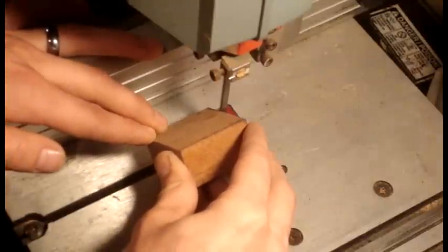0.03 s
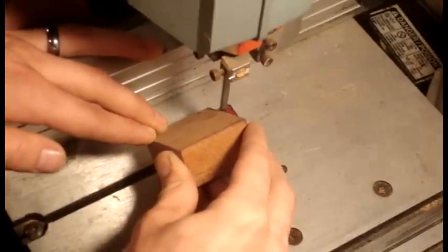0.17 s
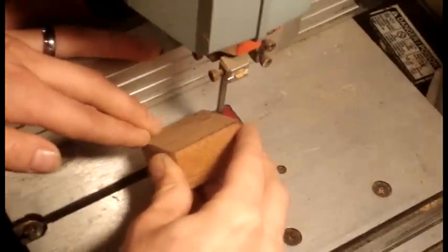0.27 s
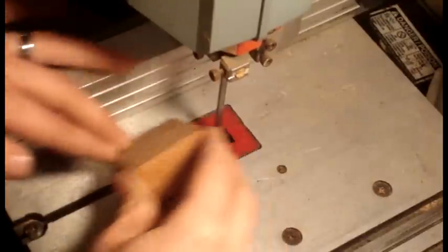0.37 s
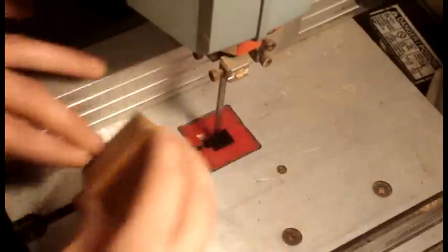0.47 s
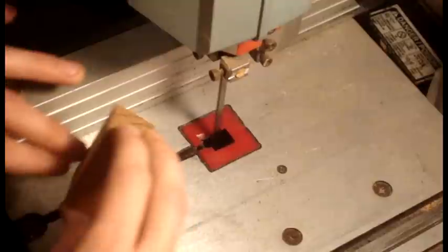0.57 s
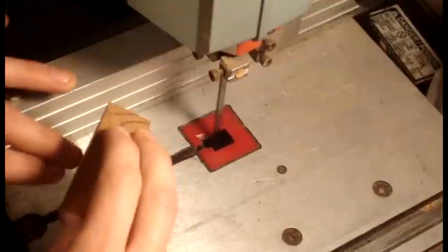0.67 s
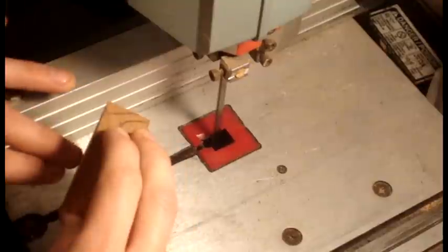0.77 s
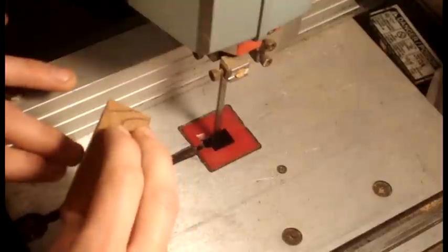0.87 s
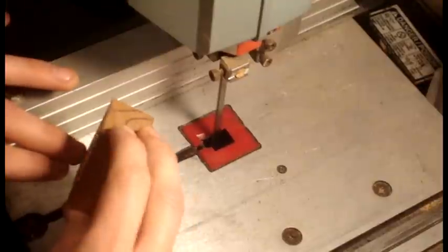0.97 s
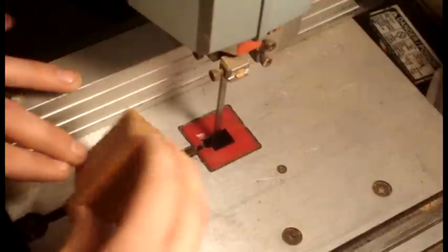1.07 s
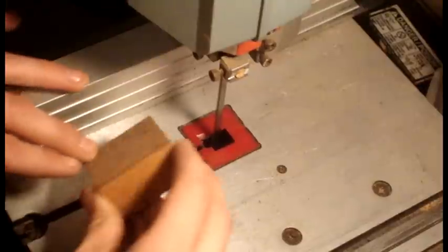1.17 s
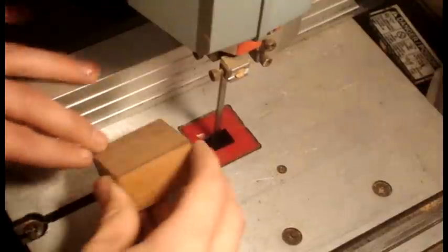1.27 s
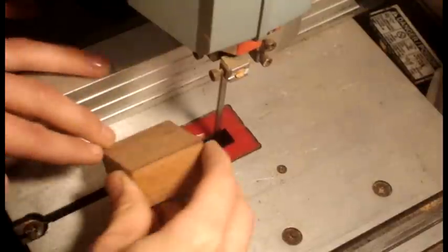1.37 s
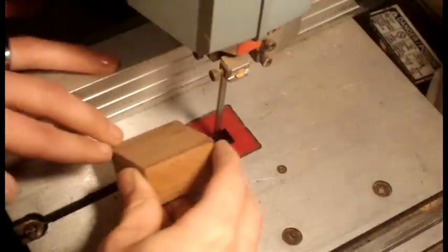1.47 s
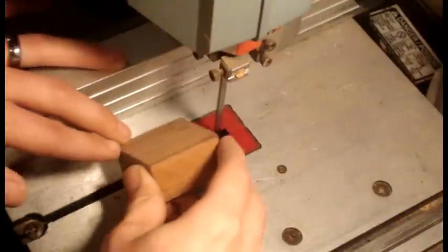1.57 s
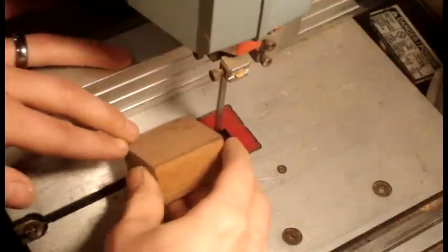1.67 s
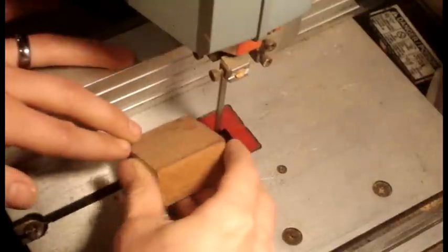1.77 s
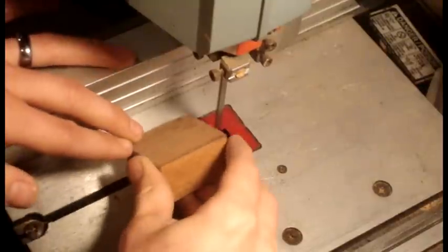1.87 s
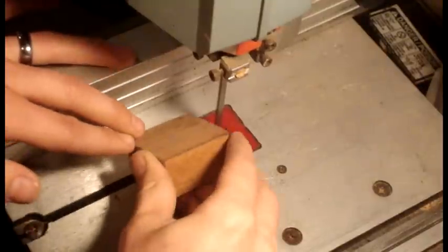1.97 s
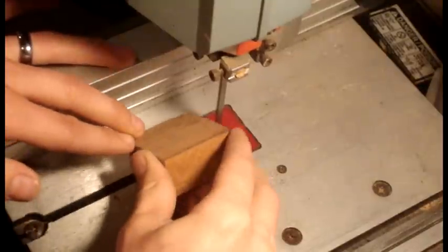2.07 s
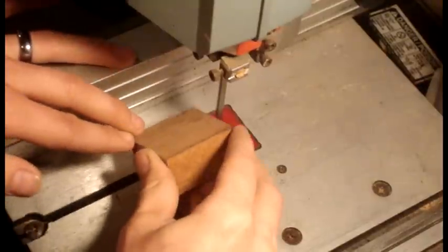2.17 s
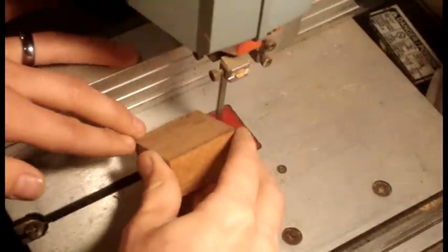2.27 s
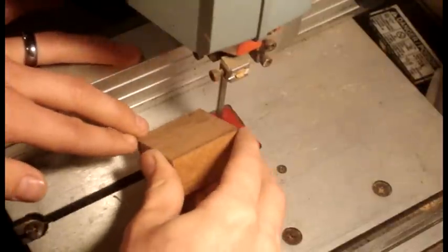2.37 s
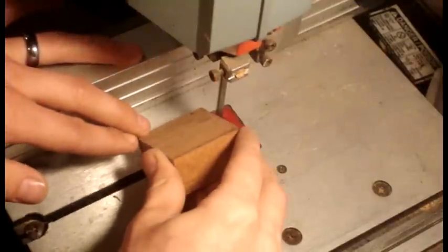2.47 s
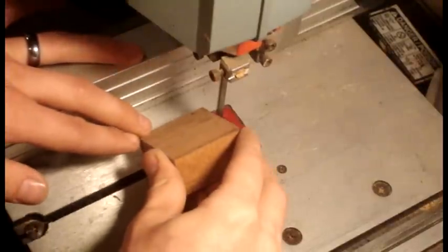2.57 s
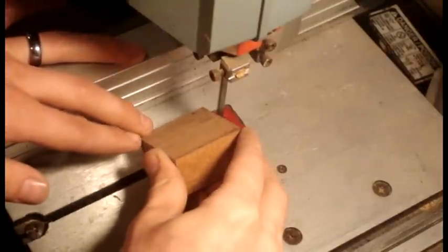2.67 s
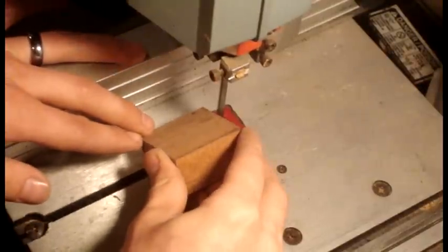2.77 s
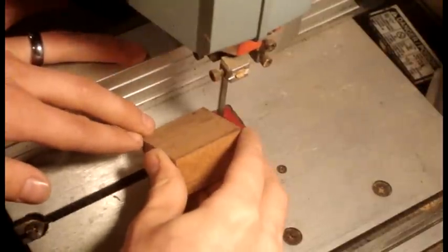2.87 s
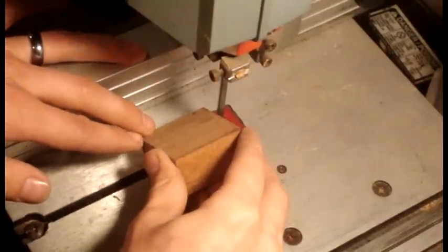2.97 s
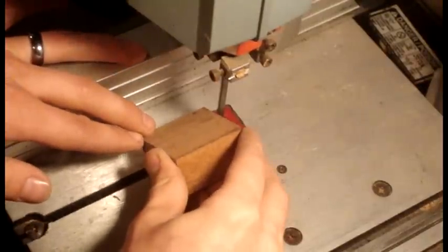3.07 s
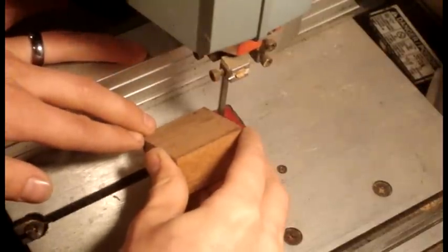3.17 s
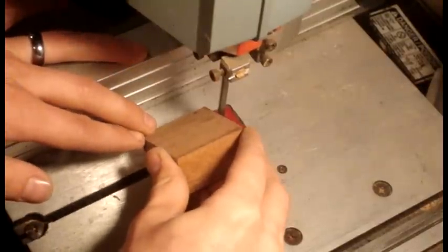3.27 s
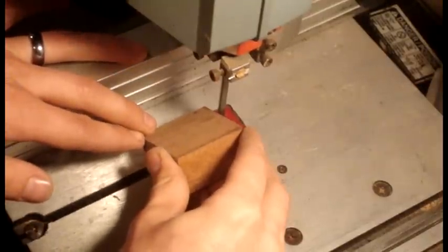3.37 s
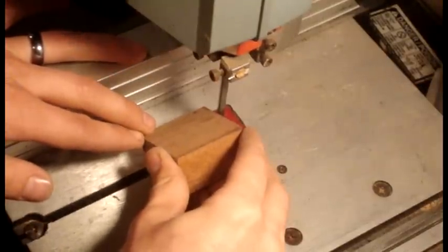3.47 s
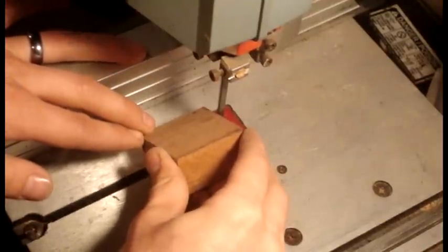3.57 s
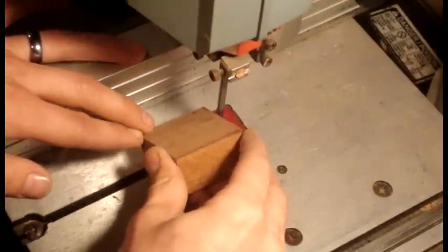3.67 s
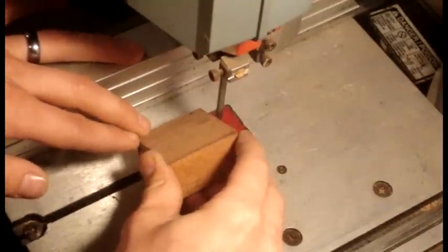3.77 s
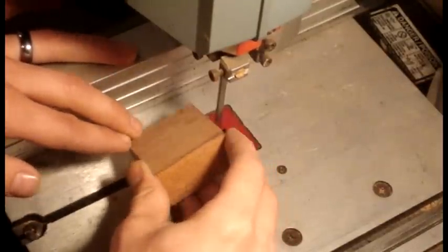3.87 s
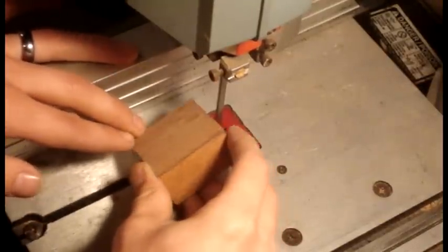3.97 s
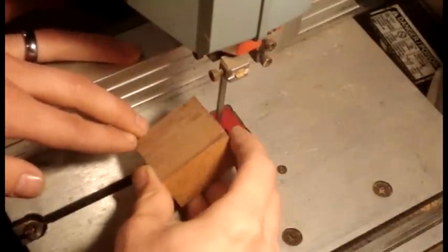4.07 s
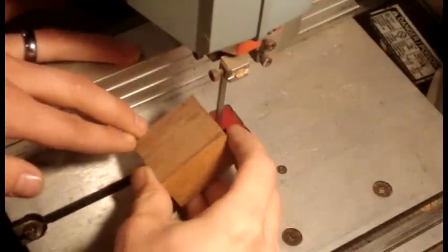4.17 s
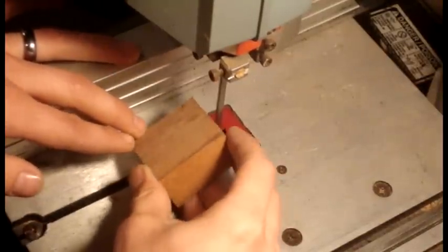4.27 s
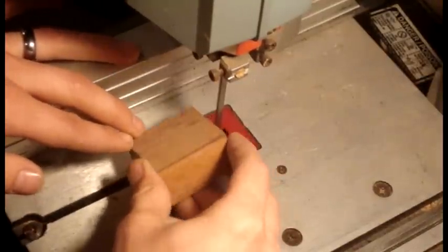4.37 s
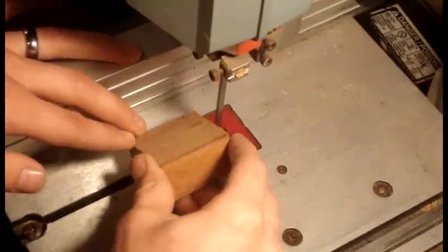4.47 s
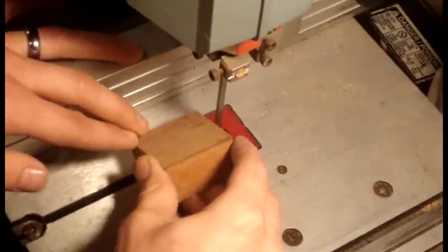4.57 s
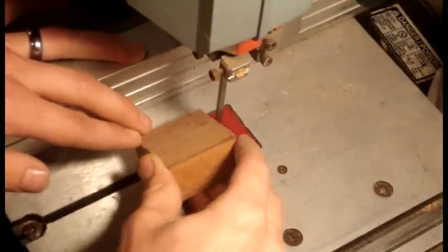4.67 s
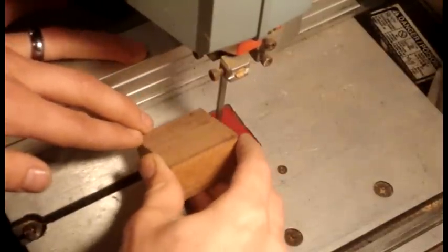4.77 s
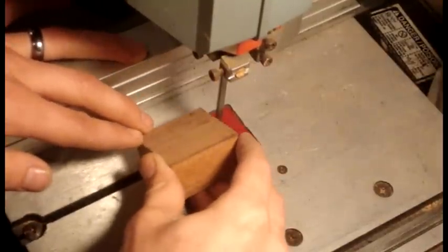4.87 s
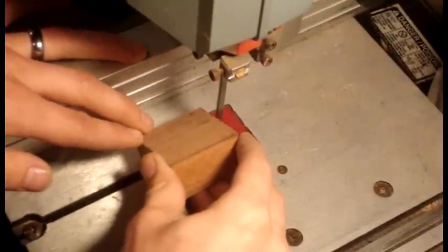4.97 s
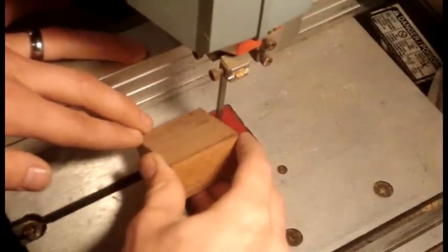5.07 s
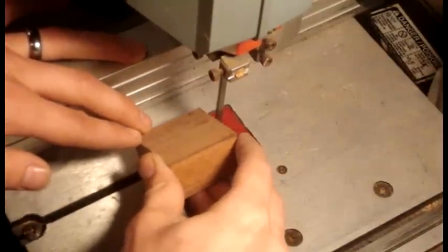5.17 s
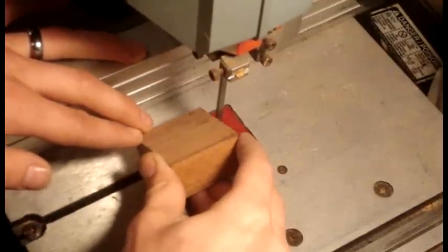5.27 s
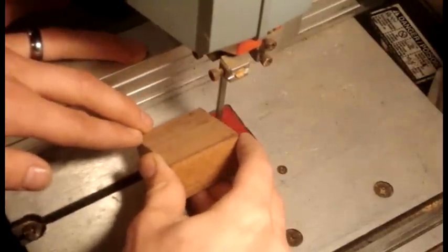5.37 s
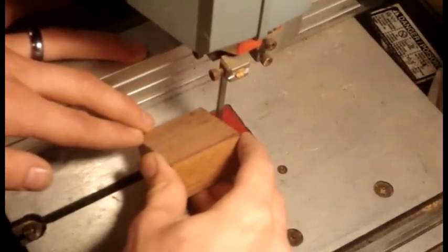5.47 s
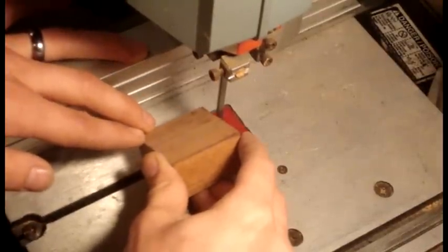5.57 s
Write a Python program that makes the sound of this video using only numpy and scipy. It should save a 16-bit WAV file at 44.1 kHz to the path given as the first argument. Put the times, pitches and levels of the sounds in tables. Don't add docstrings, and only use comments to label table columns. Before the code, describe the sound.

A small bandsaw runs continuously close to the microphone, a mid-range mechanical drone with hollow low hum, metallic ringing, hissing blade and a quick flutter of about twenty wheel knocks a second. At 0 s a wood cut is already under way, loud, shrill and rasping, with a high squeal near 3.5 kHz; around 0.25-0.3 s the blade slips free, pitches sliding, and the sound dies by 0.5 s. The idling saw, pushed down by automatic gain, creeps back up. At 1.6 s the wooden block taps the steel table. From 2.5 s a light touch brings a thin, singing whine; from about 3.15 s a firmer bite grinds and buzzes, strongest near 3.5 s, ending around 3.75 s. A bright gritty scrape flicks by at 4.0-4.1 s. The saw idles on, with a lower woody tap at 5.15 s, until 5.6 s. Dry, near-mono, slightly patchy treble.

```python
import sys
import numpy as np
from scipy import signal
from scipy.fft import rfft, irfft, next_fast_len
from scipy.io import wavfile
from scipy.ndimage import uniform_filter1d, map_coordinates

SR = 44100
rng = np.random.default_rng(int(sys.argv[2]) if len(sys.argv) > 2 else 0)


def boost(x):
    u = np.asarray(x, float) / 20
    return 10 ** u


def output_pcm(signal):
    pcm = np.clip(np.atleast_2d(signal).T, -1, 1) * 32767
    wavfile.write(sys.argv[1], SR, np.round(pcm).astype(np.int16))


N = 248503
TIME = np.arange(N) / SR
WHEEL_HZ = 19.505


def unit(x):
    return x / np.sqrt(np.mean(np.abs(x) ** 2) + 1e-20)


def level_curve(rows):
    s, db = np.transpose(rows)
    return np.interp(TIME, s, db)


def during(rows):
    start, end = rows[0][0], rows[-1][0]
    return np.interp(TIME, [start - .03, start, end, end + 0.073], [0, 1, 1, 0])


def wobble(rate):
    knots = np.cumsum(rate + 0 * TIME)[::8] / SR
    curve = map_coordinates(rng.standard_normal(N // 40), [knots])
    return np.interp(TIME, TIME[::8], curve)


def filtered(x, response):
    m = next_fast_len(N + 8192)
    return unit(irfft(rfft(x, m) * response(np.fft.rfftfreq(m, 1 / SR)), m)[:N])


def colour(points):
    f, db = np.transpose(points)
    return lambda hz: boost(np.interp(np.log(hz + 1), np.log(f + 1), db))


def resonances(peaks):
    def response(f):
        total = 0
        for k, (centre, width, db) in enumerate(peaks):
            damping = 1j * f * width
            total = total + (-1) ** k * boost(db) * damping / (centre * centre - f * f + damping)
        return total
    return response


def noise(patchy_db):
    z = signal.stft(rng.standard_normal(N + 512), nperseg=512)[2]
    field = uniform_filter1d(rng.standard_normal(z.shape), 6, 0)
    field = uniform_filter1d(field, 10, 1)
    return signal.istft(z * boost(patchy_db * unit(field)), nperseg=512)[1][:N]


def narrow(hz, width_hz, steady):
    flutter = unit(wobble(width_hz) + 1j * wobble(width_hz))
    carrier = np.exp(2j * np.pi * np.cumsum(hz + 0 * TIME) / SR)
    return unit(np.real((steady + flutter) * carrier))


def swell(start, hold, db, steep=1):
    rise = steep * 352 * np.maximum(start - TIME, 0)
    fall = 301 * np.maximum(TIME - start - hold, 0)
    return boost(db - rise - fall)


def feed():
    # (time [s], level [dB])
    cuts = [
        [(0, -36.5), (.19, -35), (.23, -33.5), (.3, -37.5), (.34, -41), (.47, -46)],
        [(2.5, -69), (2.58, -58.5), (2.72, -47), (2.8, -54), (3.1, -50.5)],
        [(3.145, -43.5), (3.3, -42), (3.43, -37), (3.51, -36.5), (3.6, -43), (3.67, -42), (3.74, -46.5),
         (3.76, -60)],
    ]
    return sum(during(rows) * boost(level_curve(rows)) for rows in cuts)


def hiss():
    tint = colour([(300, -40), (1000, -6.0), (5000, -13.5), (10000, -12.0)])
    return boost(-81.5 + 11 * wobble(30)) * filtered(noise(7.4), tint)


def orders(table, shaft_hz, turns, scatter, drift_db):
    bass, body = np.zeros(N), np.zeros(N)
    for multiple, db in table:
        multiple = round(multiple)
        phase = 2 * np.pi * turns * multiple + scatter * rng.normal()
        tone = boost(db + drift_db * wobble(2.427)) * np.cos(phase)
        if multiple * shaft_hz < 420:
            bass += tone
        else:
            body += tone
    return bass, body


def shaft_lines(turns):
    # (multiple of its turning, level [dB])
    wheel = [(5, -56.5), (6, -41), (7, -40.5), (9, -41), (11, -33.5), (13, -39), (18, -27.5), (19, -23),
             (20, -23.5), (26, -20), (28, -19.5), (30, -14.5), (33, -40), (35, -20), (43, -36), (44, -30.5),
             (64, -30), (72, -28), (74, -30), (76, -16.5), (77, -18), (81, -17.5), (82, -40.5)]
    # (multiple of its turning, level [dB])
    knock = [(50, -26), (51, -23), (52, -15), (53, -17), (54, -12), (55, -21), (56, -27)]
    # (multiple of its turning, level [dB])
    motor = [(3, -72.5), (12, -22.5), (13, -23.5), (17, -62), (24, -34), (25, -19), (49, -18)]
    # (frequency [Hz], level [dB])
    hum = [(120, -47), (240, -34), (2463, -25.5)]
    motor_hz = 28.47
    motor_turns = motor_hz * TIME + 0.0059 * wobble(2.39)
    hum_time = TIME + 0.000067 * wobble(9.6)
    parts = [orders(wheel, WHEEL_HZ, turns, scatter=1.2, drift_db=1.2),
             orders(knock, WHEEL_HZ, turns, scatter=.15, drift_db=1),
             orders(motor, motor_hz, motor_turns, scatter=2.9, drift_db=-2.5),
             orders(hum, 1, hum_time, scatter=3.3, drift_db=7.0)]
    return np.sum(parts, axis=0)


def per_turn(turns, lumpy):
    steps = 2048
    angle = 2 * np.pi * np.arange(steps) / steps
    pattern = rng.standard_normal(steps) * np.exp(lumpy * np.cos(angle))
    return unit(pattern)[(turns % 1 * steps).astype(int)]


def blade_drive(turns):
    return noise(0.76) + 0.47 * per_turn(turns, lumpy=0.36)


def stand_rumble(throb):
    # (frequency [Hz], density [dB per Hz])
    deep = [(15, -78), (25, -47), (123, -25), (188, -17), (233, -4.5), (295, -9), (356, 11.5), (420, -13),
            (550, -30), (920, -120)]
    # (frequency [Hz], width [Hz], level [dB])
    cabinet = [(350, 22, -6), (393.5, 11, -0.5)]
    rush = boost(8.0) * filtered(noise(1.1), colour(deep))
    boom = filtered(noise(2.5), lambda hz: resonances(cabinet)(hz) ** 2)
    return rush + boost(3.0 - 2.2 * throb) * boom


def frame_rush(turns):
    # (frequency [Hz], width [Hz], level [dB])
    frame = [(560.7, 34, -3), (702, 30, -10), (845.4, 33.6, -3), (1039.8, 18, 5), (1266, 59, -5),
             (1417, 80, -5), (1530, 140, -5.5)]
    # (frequency [Hz], density [dB per Hz])
    low_rush = [(180, -38), (320, -17.5), (420, -16.5), (600, -13.5), (930, -13.5), (1140, -25.5),
                (1700, -13), (2000, -21.5), (2600, -45), (4400, -120)]
    ring = boost(2.5) * filtered(blade_drive(turns), resonances(frame))
    return ring + boost(-4.5) * filtered(noise(0.94), colour(low_rush))


def guide_rush(turns):
    # (frequency [Hz], width [Hz], level [dB])
    guides = [(2120, 84, -10), (2537, 150, -4.5), (2797, 27.3, 4), (2966, 85, -5), (3884, 79, -3.5),
              (4190, 44, -10.5), (4843, 194, -3.5), (6180, 69, -10.5), (7670, 98, -14), (8390, 98, -11.5),
              (8696, 260, -15), (9860, 180, -26.5)]
    # (frequency [Hz], density [dB per Hz])
    high_rush = [(940, -43), (1600, -10.5), (1960, -12), (2830, 1), (3240, -10.5), (3810, -9), (4120, -7.5),
                 (4860, -1.5), (6910, -8), (8810, -16), (10400, -21), (13500, -61), (22000, -120)]
    ring = boost(7.0) * filtered(blade_drive(turns), resonances(guides))
    return ring + boost(1.2) * filtered(noise(1.66), colour(high_rush))


def saw():
    # (time [s], level [dB])
    gain = [(0, -48), (.48, -45), (1.21, -40.5), (1.69, -39), (2.15, -38.5), (2.41, -38), (2.74, -35.5),
            (3.09, -37.5), (3.39, -35.5), (3.51, -38), (3.59, -41), (3.68, -38.5), (3.78, -43.5),
            (3.85, -40.5), (4.03, -38.5), (4.64, -38), (4.94, -37.5), (5.63, -36.5)]
    frame_db = level_curve(gain)
    bass_db = -56 + 1.3 * (frame_db - frame_db.mean())
    guide_gain = boost(frame_db - 5.5) + boost(-11) * feed()
    first_knock_s = .0237
    turns = WHEEL_HZ * (TIME - first_knock_s) + .0015 * wobble(1.54)
    throb = np.cos(2 * np.pi * turns) + .5 * np.cos(4 * np.pi * turns + 3.6)
    low_lines, lines = shaft_lines(turns)
    shake = .7 * throb + .7 * wobble(4.5) + .8 * wobble(10.5)
    flutter = .2 * throb + .8 * wobble(5.5) + .9 * wobble(12)
    bass = stand_rumble(throb) + boost(29) * low_lines
    body = boost(shake) * frame_rush(turns) + boost(10) * lines
    treble = boost(flutter) * guide_rush(turns)
    return boost(bass_db) * bass + boost(frame_db) * body + guide_gain * treble


def table_taps():
    # (time [s], peak [dB], pitch factor of the face that lands [ratio])
    taps = [
        (1.5957, -25, 0.98),
        (5.1503, -25, 0.97),
    ]
    # (frequency [Hz], level [dB], time to fall 60 dB [s])
    wood = [(1150, -8, .05), (1320, -7, .06), (1500, -8, .05), (1830, -3, .07), (1950, -4, .05),
            (2070, 0, .09), (2300, -6, .04), (2700, -9, .03)]
    out = np.zeros(N + SR)
    t = np.arange(SR // 5) / SR
    for (s, db, pitch), face in zip(taps, (1, .64)):
        ring = 0
        for hz, level, t60 in wood:
            decay = boost(level + rng.normal(0, 1.5) - 60 * t / t60)
            ring = ring + decay * np.sin(2 * np.pi * (face * pitch * hz * t + rng.random()))
        out[round(s * SR):][:len(t)] += boost(db - 3.5) * ring * (1 - np.exp(-t / 0.0004))
    return out[:N]


def table_scrape():
    # (start [s], hold [s], level [dB])
    scrape = (4.018, 0.1, -41.5)
    grit = boost(2.9 * wobble(60) + 3.2 * wobble(400))
    tint = colour([(1500, -40), (3500, -8), (5000, -3), (7000, -5), (9200, -4),
                   (9700, 3), (10300, 1), (10800, -60)])
    return swell(*scrape, steep=8) * grit * filtered(noise(2.5), tint)


def block_song():
    # (start [s], hold [s], frequency [Hz], width [Hz], level [dB])
    songs = [(0, .2, 1278, 68.7, -34.5), (-0.1, 0.17, 1390, 25.8, -40.5), (0.6, 0.21, 3350, 35, -50.5),
             (0.12, .15, 5545, 45, -44), (0, 0.017, 6950, 72, -35.5), (.09, 0.012, 2200, 900, -38.5),
             (0.4, 0.092, 4560, 40, -43), (2.5, 0.39, 710, 100, -39), (3.16, 0.2, 735, 155, -32),
             (3.25, 0.082, 552, 70, -34), (3, 0.22, 355, 45, -38.5), (2.5, .06, 1380, 225, -35),
             (2.5, 0.16, 1270, 170, -40.5), (3.5, .03, 2530, 197, -34.5), (3.5, .05, 1322, 110, -33.5),
             (3.5, .045, 1047, 70, -34.5)]
    out = np.zeros(N)
    for s, hold, hz, width_hz, db in songs:
        out += swell(s, hold, db) * narrow(hz, width_hz, steady=.45)
    return out


def kerf_exit():
    # (from [Hz], to [Hz], width [Hz], level [dB])
    slides = [
        (860, 670, 34.9, -34.5),
        (3980, 4600, 500, -37.5),
    ]
    start, hold = .245, .045
    out = np.zeros(N)
    for from_hz, to_hz, width_hz, db in slides:
        hz = from_hz + (to_hz - from_hz) * np.clip((TIME - start) / hold, -.5, 2)
        out += swell(start, hold, db, steep=2.5) * narrow(hz, width_hz, steady=.45)
    return out


def cutting():
    # (frequency [Hz], density [dB per Hz])
    chips = [(290, -57), (500, -33), (568, 2), (620, -12.5), (1300, -13), (1870, -8), (2070, -11),
             (2290, -15), (3440, -8), (8470, -8), (10400, -14.5), (13500, -48), (22000, -120)]
    # (start [s], hold [s], multiple of the tooth rate, level [dB])
    squeals = [(0, 0.12, 5, -33), (0.148, 0.018, 5, -32.5), (.205, .02, 5, -31), (0, 0.33, 4, -54),
               (0, .3, 3, -53), (2.596, 1.1, 5, -45.5), (2.6, 1.1, 3, -46), (2.6, 1.1, 4, -45),
               (2.702, .04, 5, -45), (2.698, 0.036, 3, -42), (2.7, .04, 4, -38), (2.96, 0.17, 4, -41),
               (3.2, 0.043, 4, -38), (3.198, 0.29, 5, -43), (3.27, 0.22, 3, -36.5), (3.354, 0.05, 3, -41),
               (3.386, .08, 5, -38.5), (3.517, .04, 4, -37)]
    tooth_hz = 695.5 * (1 + 0.00149 * wobble(8))
    bite = boost(.9 * wobble(24))
    gate = (1 + np.cos(2 * np.pi * np.cumsum(tooth_hz) / SR)) ** 3
    clicks = unit(np.diff(gate ** 6, prepend=0))
    tear = noise(3.1) * (0.72 + 0.35 * gate) + 0.095 * clicks
    layer = feed() * boost(4.0) * filtered(tear, colour(chips))
    for k in (5, 3, 4):
        level = sum(swell(s, hold, db) for s, hold, multiple, db in squeals if round(multiple) == k)
        squeal = narrow(k * tooth_hz, width_hz=40, steady=1.8)
        skirt = narrow(.992 * k * tooth_hz, width_hz=130, steady=0)
        layer = layer + boost(-1.5) * level * (squeal + .55 * skirt)
    return bite * layer


def scene():
    trace = hiss()
    mono = saw() + table_taps() + table_scrape() + block_song() + kerf_exit() + cutting()
    return np.array([mono + trace, mono - trace])


def dropouts(x, share):
    hz, t, z = signal.stft(x, SR, nperseg=256)
    cells = rng.random((len(hz) // 3 + 1, len(t) // 5 + 1)) < share
    holes = np.repeat(np.repeat(cells, 3, axis=0), 5, axis=1)[:len(hz), :len(t)]
    holes = holes & (hz[:, None] > 3600)
    return signal.istft(z * np.where(holes, .02, 1), SR, nperseg=256)[1][:, :N]


def band_limit(x):
    return signal.sosfilt(signal.butter(12, 10530, fs=SR, output="sos"), x)


def record(dry):
    shelf = colour([(10050, -1.0), (10130, -22.5), (10600, -21)])
    m = next_fast_len(N)
    dulled = irfft(rfft(dry, m) * shelf(np.fft.rfftfreq(m, 1 / SR)), m)[:, :N]
    mix = dropouts(dulled, share=.035)
    return band_limit(mix)


dry = scene()
out = record(dry)
output_pcm(out)
```